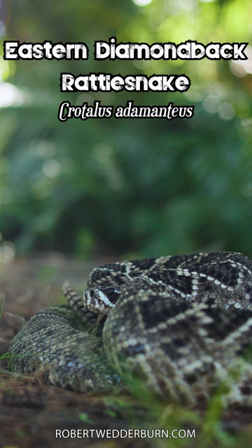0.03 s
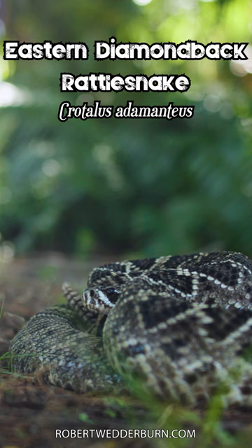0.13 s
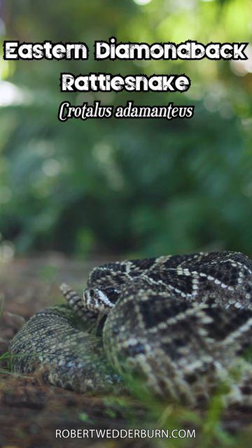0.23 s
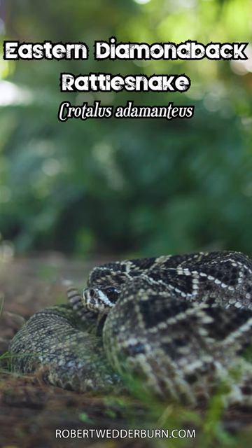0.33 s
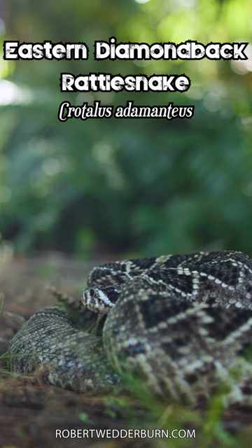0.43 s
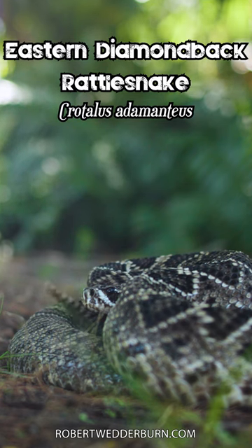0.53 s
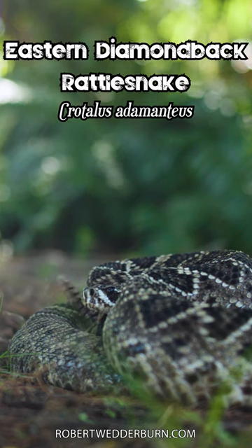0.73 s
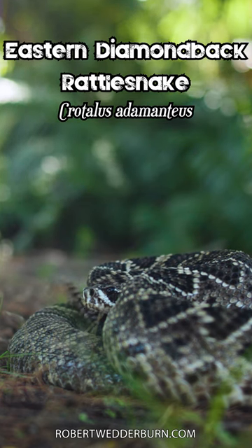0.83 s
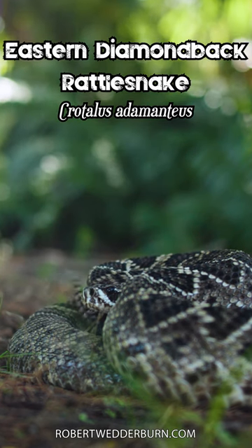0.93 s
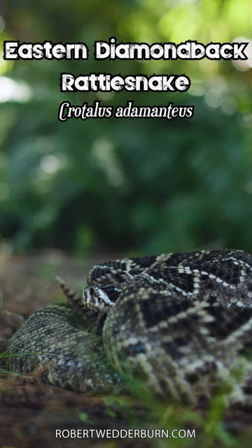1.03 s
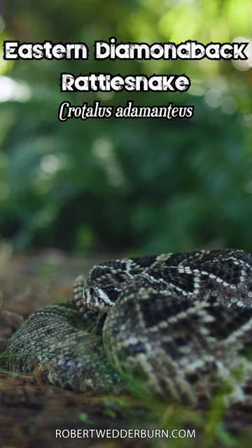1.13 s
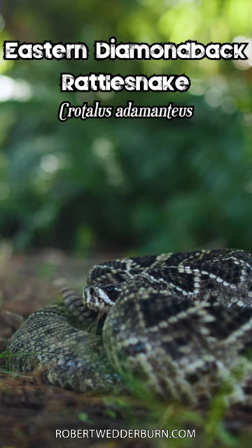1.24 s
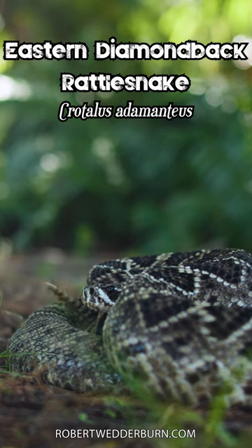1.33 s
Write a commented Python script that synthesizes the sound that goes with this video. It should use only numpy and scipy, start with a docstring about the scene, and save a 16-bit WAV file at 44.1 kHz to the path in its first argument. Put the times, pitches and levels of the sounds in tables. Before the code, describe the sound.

A rattlesnake shakes its tail in a dry, high, continuous buzz that flutters quickly. One soft low bump comes halfway through. It is close to a stereo microphone outdoors, over a very quiet rumble.

```python
"""A coiled rattlesnake buzzes its tail outdoors, close to a stereo pair of microphones.
About seventy times a second the loose hollow segments clash in a burst of tiny clicks; a slower
sway of the rattle makes the strokes louder and closer in groups. Halfway through comes one soft
low bump. A few faint dull rustles come and go over a quiet, wide rumble."""
import sys
import numpy as np
from scipy import signal
from scipy.fft import rfft, irfft, next_fast_len
from scipy.io import wavfile
from scipy.ndimage import uniform_filter1d, minimum_filter1d

SR = 44100
rng = np.random.default_rng(int(sys.argv[2]) if len(sys.argv) > 2 else 0)


def wav_record(signal):
    """Record a signal, one row per channel, as 16-bit PCM in the file named by sys.argv[1]."""
    frames = np.transpose(np.atleast_2d(signal))
    bounded = np.clip(frames, -1, 1)
    # unit amplitude maps onto the largest positive 16-bit level
    quanta = np.round(bounded * 32767).astype(np.int16)
    wavfile.write(sys.argv[1], SR, quanta)


N = 144207
TIME = np.arange(N) / SR
SIDE = np.array([[1], [-1]])   # adds on the left, subtracts on the right


def from_db(db):
    """Decibels to gain."""
    return 10 ** (np.asarray(db) / 20)


def rms_one(x):
    """Scale to unit rms."""
    return x / np.sqrt(np.mean(x ** 2) + 1e-20)


def in_time(rows):
    """A control curve at every sample."""
    return np.interp(TIME, *np.transpose(rows))


def at_hz(points, hz):
    """Read a spectrum on a log-frequency axis."""
    f, value = np.transpose(points)
    return np.interp(np.log(hz), np.log(f), value)


def drift(rate_hz):
    """A smooth random wander of unit rms."""
    hop, settle = 40, 2000
    pole = np.exp(-2 * np.pi * rate_hz * hop / SR)
    noise = rng.standard_normal(N // hop + settle + 2)
    slow = signal.lfilter([1], [1, -2 * pole, pole * pole], noise)[settle:]
    return np.interp(np.arange(N) / hop, np.arange(len(slow)), rms_one(slow))


def band(x, low_hz, high_hz):
    """A resonance with steep skirts."""
    edges = np.clip([low_hz, high_hz], 10, .48 * SR)
    return signal.sosfilt(signal.butter(2, edges, "band", fs=SR, output="sos"), x + 1e-18)


def background():
    """A quiet, wide outdoor rumble fades in; its half-octave bands waver."""
    # rumble spectrum: (frequency [Hz], relative density [dB])
    spectrum = [(30, -16), (60, -18.5), (95, 3), (135, -9), (185, -1), (215, -6), (255, -2), (330, -9.5),
                (500, -9), (800, -6), (1500, -48), (6000, -39)]
    # likeness at the two microphones: (frequency [Hz], correlation [-1 to 1])
    likeness = [(60, 0.2), (100, -0.32), (160, -0.042), (270, 0.28), (450, .6), (800, 0.74)]
    edges = 25 * 2 ** np.arange(0, 8.6, .5)
    shared_waver = drift(3)
    white = rng.standard_normal((2, 2, N))
    out = np.zeros((2, N))
    for k, (low, high) in enumerate(zip(edges, edges[1:])):
        mid, side = band(white[k % 2], low, high)
        hz = np.sqrt(low * high)
        alike = at_hz(likeness, hz)
        gain = from_db(at_hz(spectrum, hz) - 0.2 * shared_waver - drift(6.1))
        out += gain * (np.sqrt(1 + alike) * mid + np.sqrt(1 - alike) * side * SIDE)
    fade_in = np.interp(TIME, (0.073, 0.1), [0, 1])
    return from_db(-58) * rms_one(out) * fade_in


def rustles():
    """Dull, wide rustles: noise in low resonances swells and fades."""
    # swells: (peak time [s], half-length [s], level [dB])
    swells = [(.68, 0.063, -69), (0.85, .06, -56), (0.953, 0.033, -52), (1.63, 0.046, -54),
              (1.703, 0.042, -37), (2.64, 0.076, -55), (2.727, 0.067, -57)]
    # resonances: (frequency [Hz], width [Hz], relative level [dB])
    modes = [(96, 72, -4), (200, 38, -3)]
    envelope = sum(from_db(db) * np.exp(-2 * ((TIME - s) / half) ** 2) for s, half, db in swells)
    noise = rng.standard_normal((2, N))
    dull = sum(from_db(db) * band(noise, hz - width / 2, hz + width / 2) for hz, width, db in modes)
    return envelope * rms_one(dull)


def bump():
    """One soft blow: each low mode swells within about a cycle and dies away."""
    # modes: (frequency [Hz], relative level [dB], t60 [s], left minus right [dB], right lag [s])
    modes = [(99.6, 2, 0.14, 11, 0.0033), (127, -2, 0.11, 8, .0014), (185, 3, 0.1, -8, 0.0014),
             (243, -10, 0.11, -15, 0.00062), (303, -2, 0.059, 2, 0.0009), (432, -5, 0.12, 3, .0002),
             (476, -11, 0.044, -2, .0002), (628, -7.5, .06, 5, .0001), (1060, -7, 0.052, 0, .00003)]
    start_s, level_db, swell_cycles = 1.685, -25, 0.47
    start = int(start_s * SR)
    t = TIME[:SR // 3]
    out = np.zeros((2, N))
    for k, (hz, mode_db, t60, pan_db, lag) in enumerate(modes):
        age = np.maximum(t - np.array([[0], [lag]]), 0)
        swell = (1 - np.exp(-age * hz / swell_cycles)) ** 2
        ring = np.sin(2 * np.pi * hz * age) * np.exp(-np.log(1000) * age / t60)
        gain = from_db(level_db + mode_db + pan_db / 2 * SIDE)
        out[:, start:start + len(t)] += (-1) ** k * gain * swell * ring
    return out


def tail_motion():
    """The tail's quick strokes ride on a slower sway; returns the force of the clashes and the sway."""
    # tail strokes: (time [s], rate [Hz])
    stroke_rate = [(0.0, 67.58), (0.15, 72.36), (0.45, 68.56), (0.6, 71.15), (0.75, 70.08), (0.85, 67.87),
                   (1.0, 70.78), (1.3, 70.39), (1.62, 72.41), (1.78, 69.35), (1.95, 71.14), (2.38, 70.0),
                   (2.55, 73.47), (2.75, 73.61), (2.9, 69.23), (3.05, 67.61), (3.27, 72.18)]
    # sway of the whole rattle: (time [s], rate [Hz])
    sway_rate = [(0.0, 19.99), (0.25, 18.41), (0.45, 19.63), (0.7, 17.85), (0.9, 23.76), (1.05, 17.71),
                 (1.3, 19.85), (1.5, 16.07), (1.7, 18.27), (2.1, 17.2), (2.5, 18.38), (2.75, 16.78),
                 (3.0, 27.06), (3.27, 24.29)]
    # how widely it sways: (time [s], width [factor])
    sway_width = [(.1, 2.06), (.7, 1.27), (.84, 0.11), (1.1, 1.56), (2.4, 1.36), (2.6, 0.8), (2.78, 1.55),
                  (2.95, 0.87), (3.27, 0.23)]
    # the snake's effort: (time [s], relative level [dB])
    effort = [(.04, -110), (.075, -29), (.09, -21), (.6, -22.5), (1.0, -21.5), (1.4, -21), (2.1, -21),
              (2.7, -21), (3.27, -21)]
    # the rattle catches for an instant: (time [s], dip [dB])
    catches = [(0.348, 9), (0.61, 12), (0.665, 8.5), (0.716, 10), (1.108, 7), (1.162, 11), (1.769, 18),
               (2.057, 15), (2.113, 17.5), (2.168, 6.5), (2.338, 7), (2.394, 9)]
    bunch_cycles, lean_rad, catch_half_s = 0.17, 0.43, 0.0045
    width = in_time(sway_width)
    sway_angle = 2 * np.pi * np.cumsum(in_time(sway_rate)) / SR
    sway = width * np.cos(sway_angle)
    bunching = bunch_cycles * np.sin(sway_angle + 0.4)   # strokes crowd together on the sway
    stroke_angle = 2 * np.pi * (np.cumsum(in_time(stroke_rate)) / SR + bunching)
    stroke = np.cos(stroke_angle + lean_rad * (1 - np.cos(stroke_angle)))   # slow build, quick stop
    swing_db = (2 + 0.47 * sway) * stroke
    clash_db = 4 * ((1 + stroke) / 2) ** 16.6 * (1 + sway) / 2   # hard crest of the strong strokes
    turn_db = 5.5 * width * ((1 - stroke) / 2) ** 3.2   # hush as the tail turns round
    sway_bottom = ((1 - np.cos(sway_angle + 0.15)) / 2) ** 9.7
    lull_db = 2 * width ** 2 * sway_bottom * np.maximum(1 + 0.5 * drift(8.7), 0)
    uneven_db = (1 - 0.37 * sway) * drift(61)   # weak strokes vary more than strong ones
    catch_db = sum(db * np.exp(-((TIME - s) / catch_half_s) ** 2) for s, db in catches)
    force = rms_one(from_db(swing_db + clash_db - turn_db - lull_db - catch_db + uneven_db))
    return force * from_db(in_time(effort)), sway


def delayed(x, seconds):
    """Later arrival at one microphone, exact to a fraction of a sample."""
    size = next_fast_len(N + SR)
    hz = np.arange(size // 2 + 1) * SR / size
    return irfft(rfft(x, size) * np.exp(-2j * np.pi * hz * seconds), size)[:N]


def rattle():
    """Close up, segments click together at random; each click strikes each resonance differently."""
    # segment resonances: (frequency [Hz], width [Hz], relative level [dB], stereo spread [0-1])
    shell_modes = [(1188, 610, -28, 0.06), (1560, 486, -19.5, 0), (1990, 520, -26.5, 0),
                   (3327, 956, -9.5, 0.02), (4203, 886, -6, 0.3), (5432, 1050, -1.5, 0.29),
                   (6838, 823, -1.5, 0.1), (7720, 1730, -13, 0.35), (9970, 1280, -15.5, .3),
                   (12400, 2100, -10.5, 0.46), (15000, 3200, -19.5, 0.5)]
    clicks_per_s, click_spread_db, mode_spread = 11000, 5.0, 0.83
    body_hz, body_sway_db = 2500, 1.5   # the low resonances answer the sway more strongly
    force, sway = tail_motion()
    hits = rng.random(N) < clicks_per_s / SR
    polarity = rng.choice([-1, 1], N)
    clicks = rms_one(hits * polarity * from_db(click_spread_db * rng.uniform(-0.75, 1, N)))
    out = np.zeros((2, N))
    for hz, width, db, apart in shell_modes:
        strength = rms_one(rng.choice([-1, 1], N) + mode_spread * rng.uniform(-0.79, 1, N) * np.sqrt(3))
        struck = clicks * (strength + apart * rng.standard_normal(N) * SIDE)
        drive = force * from_db(db + body_sway_db * sway * (hz < body_hz))
        width_gain = np.sqrt(SR / width) / 2   # same power for narrow and wide resonances
        out += width_gain * band(struck * drive, hz - width / 2, hz + width / 2)
    left, right = out
    return np.array([delayed(left, seconds=13e-6), right])


def scene():
    """At the microphones: the rattle in front, with the bump, the rustles and the rumble."""
    return rattle() + bump() + rustles() + background()


def record(dry):
    """The recorder rolls off the deep bass, limits the hardest clashes and cuts the top steeply."""
    low_cut_hz, high_cut_hz = 56, 15830
    limit_db, limit_s = -4, 0.0037
    x = signal.sosfilt(signal.butter(2, low_cut_hz, "high", fs=SR, output="sos"), dry)
    span = int(limit_s * SR)
    allowed = np.minimum(1, from_db(limit_db) / (np.abs(x).max(axis=0) + 1e-9))
    gain = uniform_filter1d(minimum_filter1d(allowed, span), span)
    return signal.sosfilt(signal.ellip(14, .1, 90, high_cut_hz, fs=SR, output="sos"), x * gain)


dry = scene()
out = record(dry)
wav_record(out)
```